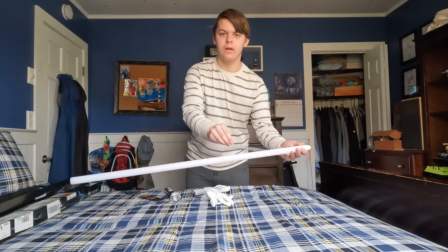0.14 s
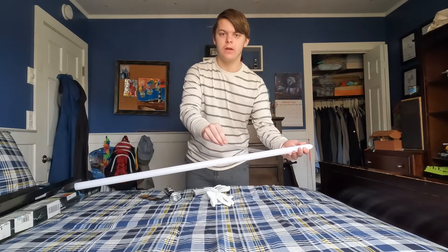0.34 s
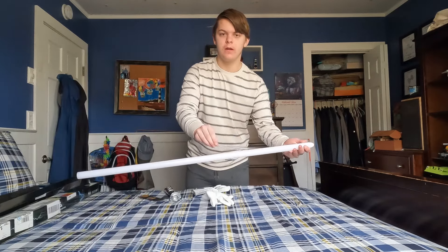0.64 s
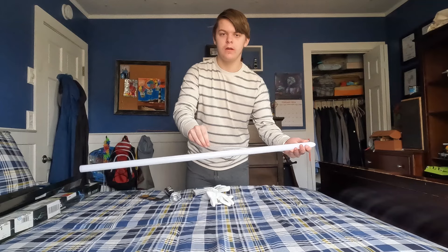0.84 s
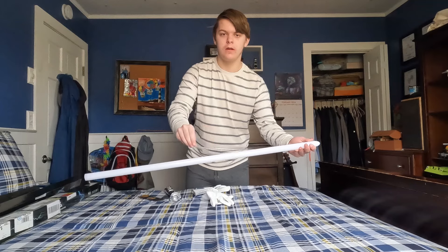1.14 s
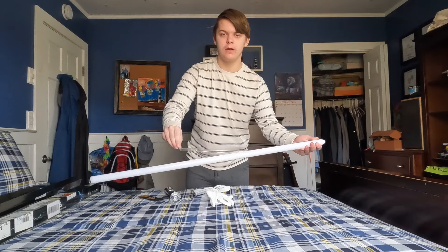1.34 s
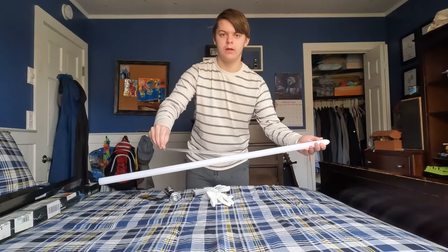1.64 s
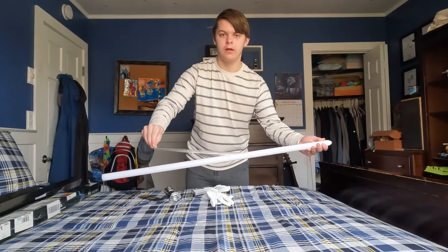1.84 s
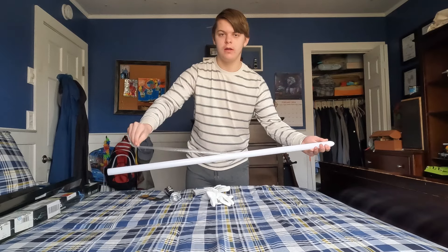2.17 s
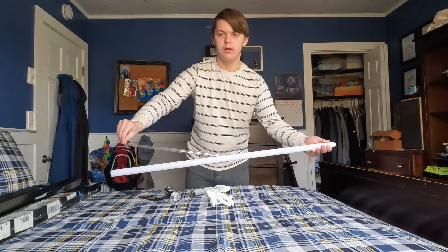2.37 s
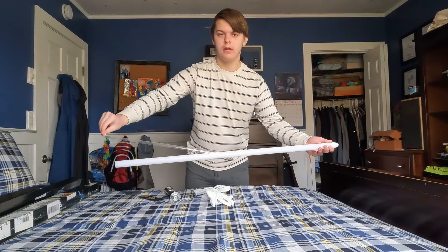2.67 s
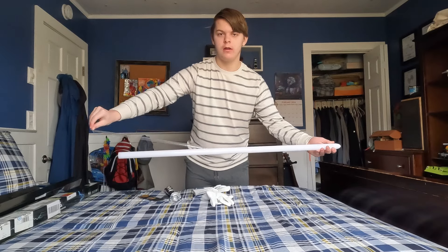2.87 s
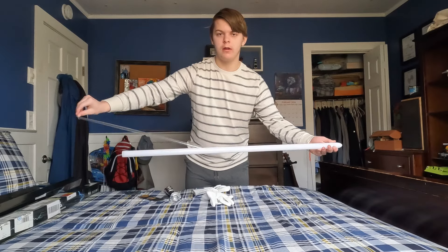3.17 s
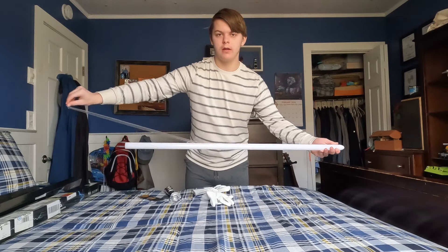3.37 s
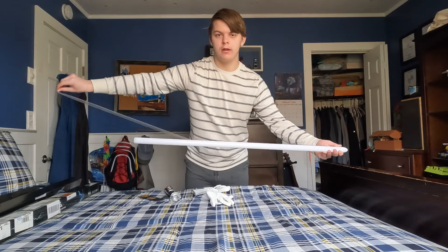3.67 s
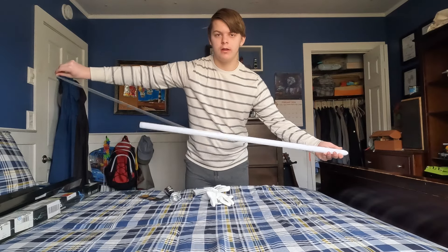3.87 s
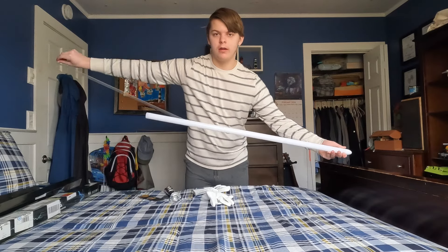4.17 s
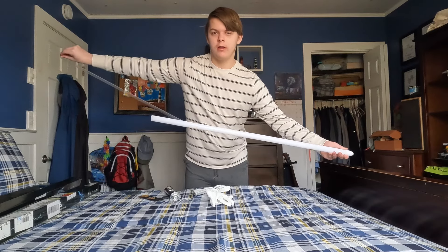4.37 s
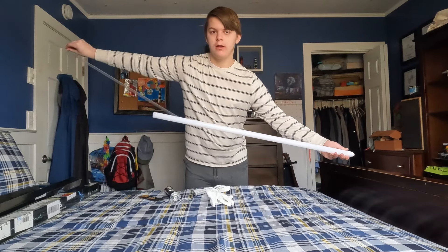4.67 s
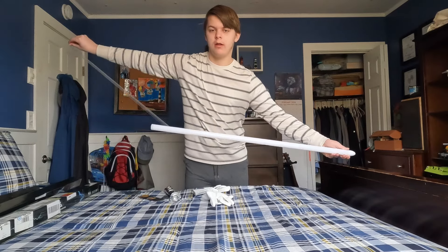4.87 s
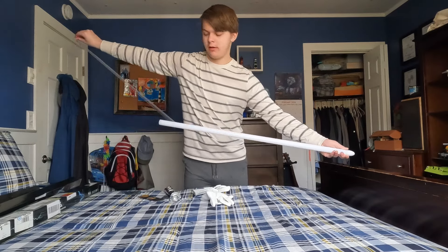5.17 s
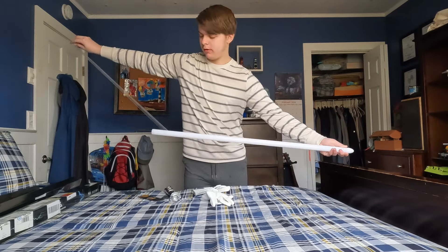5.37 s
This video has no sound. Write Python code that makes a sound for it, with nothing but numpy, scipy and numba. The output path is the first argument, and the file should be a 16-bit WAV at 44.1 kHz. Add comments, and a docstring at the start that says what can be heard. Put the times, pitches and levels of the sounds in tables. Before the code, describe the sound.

Protective film is pulled from a long plastic tube in a small furnished bedroom. A bright, thin hiss of tiny snaps starts at once, dips twice early, then runs fairly smoothly. After three seconds it turns jerky, with sharp cracks clustering near four seconds and a strong rip at about four and a half. It stops around five, leaving a few ticks and faint room tone. Stereo microphone a short distance away, short dense echo.

```python
"""A hissing, crackling peel: protective film is pulled off a long plastic tube in a small bedroom.
The glue lets go in quick, uneven slips, each a shower of tiny snaps that ring the taut film.
Single louder cracks stand out; the freed strip flutters, crumples and thrums, and hand and sleeve brush softly.
Underneath, the moving arm stirs a little air in the quiet of the house.
Every sound is shaped noise or clicks; the film sounds also pass through a short room echo."""
import sys
import numpy as np
from scipy import signal
from scipy.fft import rfft, irfft
from scipy.io import wavfile
from scipy.ndimage import uniform_filter1d
from numba import njit

SR = 44100
rng = np.random.default_rng(int(sys.argv[2]) if len(sys.argv) > 2 else 0)


def to_wav(s):
    """Save 16-bit WAV."""
    ch = np.atleast_2d(s).T  # columns
    pcm = np.round(np.clip(ch, -1, 1) * 32767)  # PCM
    wavfile.write(sys.argv[1], SR, pcm.astype(np.int16))


N = 243255
T = np.arange(N) / SR  # time of each sample, s

# Colour of the long, slack film: (frequency [Hz], spectrum level [dB])
FILM_COLOUR = [(500, -39), (980, -30), (1450, -18), (2200, -16.5), (3400, -8.5), (4400, -3), (5000, 0.5),
               (6600, -4), (7600, -4), (8250, -9.5), (9800, -11.5), (10600, -9), (13600, -16.5),
               (15000, -28.5)]
# Colour of the film while the freed strip is short and taut: (frequency [Hz], spectrum level [dB])
TAUT_FILM_COLOUR = [(500, -47), (950, -47), (1450, -30), (2500, -7), (3300, -25), (4450, 2), (5100, 3),
                    (6600, 6.5), (7700, -11), (8300, -4), (9900, 0), (10650, 6), (12200, 1), (15000, -29)]
# Blend towards the taut colour: (time [s], share [0-1])
TAUT_SHARE = [(0, 0.3), (1.3, 0.37), (3.4, 0.05)]
# Main resonance of the film between tugs: (time [s], frequency [Hz])
RING = [(0, 5600), (.56, 4680), (.92, 7050), (1.08, 4840), (1.22, 7340), (2.3, 6030), (4.6, 6370),
        (5.5, 5940)]
# Treble against the resonance between tugs: (time [s], level [dB])
SHEEN = [(0, -11), (1.06, -8), (1.36, 0.5), (1.8, -12.5), (2.25, -3.5), (2.6, -6.5), (4.45, -6), (5.5, -7)]
PULL_JERK, TUG_JERK = .24, .62  # share of the sound's power that comes in slips
WAVER_DB, WAVER_JERK_DB = .5, .5  # unevenness of the peel, and what full jerking adds
TUG_SAG_HZ, SHEEN_TUG_DB = 630, -1  # a tug lowers the resonance and the treble by this much
BODY_SHORT_DB, BODY_LONG_DB = -16, -7  # mid-range against the resonance, short strip and long
KNOCK_DB = -29  # knock of the tube against the resonance, before the tug's extra body


def peel():
    """Showers of snaps ring the film: an even pull gives a smooth hiss, a jerky one crackles and wavers."""
    gain, tugging, tug_body_db = effort()
    jerk = PULL_JERK + (TUG_JERK - PULL_JERK) * tugging
    slip_power = slips(rate=190, uneven=.3, scatter_db=3.3, fade_s=0.002)
    release = np.sqrt(1 - jerk + jerk * slip_power)
    threads = crackle(rate=13000, scatter_db=2.2)
    waver = undb((WAVER_DB + WAVER_JERK_DB * jerk) * walk(45))
    showers = threads * release * waver

    # the taut colour gives way to the slack one as the freed strip grows long
    taut = np.clip(curves(TAUT_SHARE)[0], 0, 1)
    taut_film = unit(colour(showers, TAUT_FILM_COLOUR))
    slack_film = unit(colour(showers, FILM_COLOUR))
    film = taut * taut_film + (1 - taut) * slack_film

    # the main resonance rises and falls with the tension at the peel line
    ring_hz = curves(RING)[0] - TUG_SAG_HZ * tugging
    film = film + 0.74 * resonance(film, ring_hz, width_hz=3400.0)
    body, ring, sheen = (unit(part) for part in split(film, low_hz=3744, high_hz=8460))

    # a longer strip radiates more of the mid-range
    body_db = np.linspace(BODY_SHORT_DB, BODY_LONG_DB, N) + tug_body_db
    sheen_db = curves(SHEEN)[0] + SHEEN_TUG_DB * tugging
    # hard slips also knock the tube, lower than the film rings
    knock = undb(KNOCK_DB + tug_body_db) * tugging * unit(band(showers, lo_hz=950, hi_hz=1610))
    return gain * (ring + undb(body_db) * body + undb(sheen_db) * sheen + knock)


# Steady pull of the arm, with two early hesitations and a halt: (time [s], peel level [dB])
PULL = [(0, -37), (.38, -41), (.61, -39.5), (.71, -53), (.8, -52.5), (.9, -40), (1.07, -44.5),
        (1.22, -44.5), (1.32, -55), (1.6, -44), (1.9, -41.5), (2.05, -45.5), (2.65, -44.5), (3.1, -47),
        (4.28, -49.5), (4.58, -34), (4.8, -49), (4.98, -48), (5.02, -65.5), (5.5, -105)]
# Sharp tugs, in which the glue lets go in jerks:
# (start time [s], length [s], level [dB], extra mid-range body [dB])
TUGS = [(0, 0.0074, -32.5, -1.5), (0.097, 0.026, -43, -16), (0.46, 0.083, -43, 2), (0.731, 0.013, -50, 12),
        (1.103, 0.067, -48, 2), (2.774, 0.063, -41, -3), (2.879, 0.03, -39, -1.5),
        (3.345, 0.065, -39.5, -4), (3.446, 0.014, -35, -4), (3.521, 0.03, -38, 1.5), (3.814, 0.039, -42, 1),
        (3.868, 0.042, -39, 3.5), (3.936, 0.044, -31, -0.5), (3.996, 0.044, -32, -1),
        (4.108, 0.023, -41, 2), (4.216, 0.012, -38, -1), (4.306, 0.072, -44.5, -1), (4.55, 0.047, -41, -27),
        (4.821, 0.027, -42, 9), (4.912, 0.031, -42.5, 4), (5.094, 0.013, -66.5, -11),
        (5.194, 0.013, -66.5, -12.5), (5.352, .03, -51.5, -5.5), (5.379, 0.0093, -48, 7),
        (5.51, .03, -40.5, -3)]
TUG_ATTACK_S, TUG_RELEASE_S = .005, .017


def effort():
    """Peel gain, the tugs' share of its power and their extra body; a tug rises, holds and dies away."""
    tugs = body = 0
    for s, length, db, body_db in TUGS:
        attack = (1 + np.tanh((T - s) / (2 * TUG_ATTACK_S))) / 2
        release = np.exp(-np.maximum(T - s - length, 0) / TUG_RELEASE_S)
        tug = (undb(db) * attack * release) ** 2
        tugs = tugs + tug
        body = body + body_db * tug
    power = undb(curves(PULL)[0]) ** 2 + tugs
    return np.sqrt(power), tugs / power, body / power


def slips(rate, uneven, scatter_db, fade_s, count=3000):
    """Power of the stick-slip: each slip starts at once and dies within milliseconds."""
    chance = rng.standard_normal((count, 2))
    gaps = np.exp(uneven * chance[:, 0])  # uneven waits, in units of the mean pace
    at = (np.cumsum(gaps) * SR / rate).astype(int)
    inside = at < N
    strength = undb(scatter_db * np.clip(chance[inside, 1], -2, 2)) ** 2
    kicks = np.bincount(at[inside], strength, N)
    power = signal.lfilter([1], [1, -np.exp(-2 / (fade_s * SR))], kicks)
    return power / power.mean()


def crackle(rate, scatter_db):
    """Tiny random snaps, of either sign and unequal size, scaled to rms 1."""
    happens = rng.random(N) < rate / SR
    sign = rng.choice([-1, 1], N)
    size = undb(scatter_db * np.clip(rng.standard_normal(N), -2, 2))
    return unit(happens * sign * size)


@njit
def resonance(x, hz, width_hz):
    """State-variable band-pass whose centre may move; gain 1 at the centre."""
    y, b, l = np.empty(len(x)), 0., 0.  # output, band-pass state, low-pass state
    for i in range(len(x)):
        g, k = np.tan(np.pi * hz[i] / SR), width_hz / hz[i]
        v = (b + g * (x[i] - l)) / (1 + g * (g + k))
        b, l, y[i] = 2 * v - b, l + 2 * g * v, k * v
    return y


# Single loud snaps of the glue: (time [s], level before the shared gain and film colour [dB])
SNAPS = [(0.1334, -24), (0.3346, -27), (1.2384, -29), (2.8414, -26), (2.9108, -25), (3.3633, -27),
         (3.3874, -26), (3.4604, -20), (3.4654, -22), (3.5304, -23), (3.8684, -23), (3.8984, -23),
         (3.9524, -18), (3.9674, -18), (4.3141, -28), (4.5635, -21), (4.8359, -24), (4.8514, -25),
         (4.9217, -26), (5.1023, -52), (5.1627, -56), (5.2066, -50), (5.3892, -32), (5.3924, -31)]
SNAP_GAIN_DB, SNAP_SPRAY, SNAP_FADE_S = 16, .3, .001  # shared gain, spray against the crack, spray decay


def snaps(size=400):
    """A larger patch of glue gives way: one crack and a short spray after it."""
    out = np.zeros(N + size)
    for (s, db), spray in zip(SNAPS, rng.standard_normal((len(SNAPS), size))):
        burst = SNAP_SPRAY * spray * np.exp(-T[:size] / SNAP_FADE_S)
        burst[0] = 1  # the crack itself
        at = int(s * SR)
        out[at:at + size] += undb(db + SNAP_GAIN_DB) * burst / np.linalg.norm(burst)
    return colour(out[:N], FILM_COLOUR)


# Colours of flutter and crumpling: (frequency [Hz], relative level [dB])
FLUTTER_COLOUR = [(70, -47), (130, -11), (190, -3.5), (260, -0.5), (350, -4.5), (450, -14.5), (800, -37)]
CRUMPLE_COLOUR = [(250, -7), (420, -2.5), (640, -2.5), (900, -16), (1500, -17.5)]
# Steady flutter of the loose strip, around which it wavers: (time [s], level [dB])
FLUTTERING = [(0, -70.5), (1.05, -79), (1.5, -69), (2.5, -65), (3.5, -59.5), (4.1, -64), (4.6, -69),
              (5.2, -94)]
# Larger flaps of the strip: (middle time [s], length [s], level [dB], crumpling against the flap [dB])
FLAPS = [(.3, 1, -71, -1), (1.268, 0.13, -69, 8.5), (1.387, 0.14, -60, -16), (1.627, 0.089, -58, -22),
         (1.983, 0.27, -60.5, -6), (2.788, 0.22, -61, 2), (3.107, 0.61, -60.5, -26),
         (3.727, 0.16, -57.5, -3.5), (3.888, 0.055, -60, 6), (4.178, .08, -60.5, 4.5),
         (4.311, 0.21, -55.5, -1), (4.865, 0.33, -52.5, -2), (5.381, 0.066, -59, 0)]
FLUTTER_CRUMPLE_DB = -3.5  # crumpling against the steady flutter


def strip():
    """The freed film flaps with a soft low flutter and crumples a little higher."""
    steady = undb(curves(FLUTTERING)[0] + walk(16))
    flaps = swells((s, length, db) for s, length, db, _ in FLAPS)
    creases = swells((s, length, db + crumple_db) for s, length, db, crumple_db in FLAPS)
    flutter = unit(colour(rng.standard_normal(N), FLUTTER_COLOUR))
    crumple = unit(colour(crackle(rate=700, scatter_db=0.5), CRUMPLE_COLOUR))
    flutter_gain = np.hypot(steady, flaps)
    crumple_gain = np.hypot(undb(FLUTTER_CRUMPLE_DB) * steady, creases)
    return flutter_gain * flutter + crumple_gain * crumple


# Thrum of the stretched strip: (time [s], pitch of the lowest mode [Hz], its level [dB])
THRUM = [(.9, 175, -85), (1.15, 175, -67), (1.5, 240, -72), (1.63, 235, -64), (2.05, 250, -55.5),
         (2.3, 195, -61.5), (2.6, 177, -58), (3.1, 164, -63), (3.85, 160, -60.5), (4.02, 175, -73.5),
         (4.25, 195, -59), (4.55, 190, -86)]
SECOND_MODE_RATIO, SECOND_MODE_DB = 1.9, -15.5  # pitch and level against the lowest mode


def thrum(width_hz):
    """The stretched strip is shaken at random and answers in its two lowest modes."""
    hz, level_db = curves(THRUM)
    phase = 2 * np.pi * np.cumsum(hz) / SR

    def mode(ratio):
        """A tone whose strength and phase wander at random."""
        wander = walk(width_hz) + 1j * walk(width_hz)
        return np.real(wander * np.exp(1j * ratio * phase))

    return undb(level_db) * (mode(1) + undb(SECOND_MODE_DB) * mode(SECOND_MODE_RATIO))


# Soft brushes of hand and sleeve:
# (middle time [s], length [s], low edge [Hz], high edge [Hz], level [dB])
BRUSHES = [(0.206, 0.63, 49.7, 139, -69), (.9, 0.97, 59, 140, -71), (1.907, 0.71, 62, 124, -60),
           (5.315, 0.078, 453, 1840, -69.5)]


def brushes():
    """Dull swells of band-passed noise: rubbing as the grip and the arm shift."""
    out = 0
    for s, length, lo_hz, hi_hz, db in BRUSHES:
        rub = unit(band(rng.standard_normal(N), lo_hz, hi_hz))
        out = out + undb(db) * swell(s, length) * rub
    return out


def travelling(x, count):
    """The peel line moves along the tube, so each stretch of the way has its own echo pattern."""
    way = np.linspace(0, count - 1, N)
    out = 0
    for k in range(count):
        # neighbouring stretches blend smoothly
        share = np.cos(np.pi / 2 * np.clip(2 * abs(way - k) - .5, 0, 1)) ** 1.4
        out = out + bedroom(x * share, wet_db=1.5, build_s=0.00047)
    return out


# Likeness of the echo at the two microphones: (frequency [Hz], likeness, held within -1..1)
LIKENESS = [(100, 1.1), (500, 0.85), (1050, -0.77), (2150, 0.76), (3100, -0.64), (4400, 0.77), (6200, 0.49),
            (8300, 0.13), (9400, 0.35), (10500, 0.5), (11600, -0.16), (14000, -1)]
# Stereo balance: (frequency [Hz], left minus right [dB])
BALANCE = [(100, -3.5), (700, 1.6), (1300, -5.5), (1900, 1), (2800, 4), (3400, -2), (4300, 1), (5300, 2),
           (5900, -1), (6700, 3.5), (8000, 2.5), (10300, 2.5), (11400, 5.5), (15000, 6.5)]
ROOM_T60_S = 0.23  # time for the echo to fall by 60 dB


def bedroom(x, wet_db, build_s, size=16384):
    """Direct sound plus a short dense echo, whose likeness at the two microphones changes with pitch."""
    t = T[:size]
    decay = undb(-60 * t / ROOM_T60_S) * (1 - np.exp(-t / build_s))
    tails = rng.standard_normal((2, size)) * decay
    mid, side = rfft(tails / np.linalg.norm(tails, axis=1)[:, None])
    alike = np.clip(over_bins(LIKENESS, size), -1, 1)
    mid = mid * np.sqrt((1 + alike) / 2)
    side = side * np.sqrt((1 - alike) / 2)
    wet = undb(wet_db)
    ports = (1 + wet * np.array([mid + side, mid - side])) / np.hypot(1, wet)
    ports = ports * undb(np.outer([1, -1], over_bins(BALANCE, size)) / 2)
    lead = 256  # samples of room for the part of the response that comes before time zero
    response = np.roll(irfft(ports), lead, axis=1)
    return signal.fftconvolve(x[None], response, axes=1)[:, lead:lead + N]


# Colour of the stirred air: (frequency [Hz], relative level [dB])
DRAUGHT_COLOUR = [(12, 12.5), (24, 15.5), (45, 4), (90, -34), (200, -54)]
# Stirred air of the sweeping arm: (middle time [s], length [s], level [dB])
GUSTS = [(2.88, 0.25, -48), (3.13, 0.4, -59), (3.79, 0.38, -59), (4.75, 0.44, -58.5), (5.3, 0.96, -60.5)]
STILL_AIR_DB = -71.5


def stirred_air():
    """Very low noise that swells as the sweeping arm moves the air."""
    gain = np.hypot(undb(STILL_AIR_DB), swells(GUSTS))
    return background(DRAUGHT_COLOUR, side_db=-31) * gain


# Colour of the quiet house: (frequency [Hz], relative level [dB])
QUIET_COLOUR = [(20, -15), (60, -8), (90, -12), (170, -1), (240, -8), (500, -16.5), (1000, -29),
                (3000, -33.5), (8000, -43), (15000, -46)]


def quiet_house():
    """Faint steady noise, mostly low."""
    return undb(-69) * background(QUIET_COLOUR, side_db=-3.5)


def background(points, side_db):
    """Steady noise of one colour; a shared part plus an opposed part that sets the width."""
    mid, side = (unit(colour(rng.standard_normal(N), points)) for _ in range(2))
    return mid + undb(side_db) * np.outer([1, -1], side)


def undb(db):
    """Decibels to amplitude."""
    return 10 ** (np.asarray(db) / 20)


def unit(x):
    """Scale to rms 1."""
    return x / np.sqrt(np.mean(x ** 2))


def curves(table):
    """The columns of a time table, one value a sample."""
    s, *columns = np.transpose(table)
    return [np.interp(T, s, c) for c in columns]


def over_bins(points, size):
    """A (frequency [Hz], value) table read at the bins of a transform, on a log frequency scale."""
    hz, value = np.transpose(points)
    bins_hz = np.arange(size // 2 + 1) * SR / size
    return np.interp(np.log(bins_hz + 1), np.log(hz), value)


def colour(x, points, size=4096):
    """Causal minimum-phase filter with the given spectrum, so that clicks keep their sharp front."""
    cepstrum = irfft(np.log(undb(over_bins(points, size))))
    # fold the cepstrum onto positive time
    cepstrum[1:size // 2] *= 2
    cepstrum[size // 2 + 1:] = 0
    return signal.fftconvolve(x, irfft(np.exp(rfft(cepstrum))))[:N]


def band(x, lo_hz, hi_hz):
    """Causal band-pass."""
    edges = [lo_hz, min(hi_hz, SR / 2 - 1)]
    return signal.sosfilt(signal.butter(3, edges, "band", fs=SR, output="sos"), x)


def split(x, low_hz, high_hz):
    """Bass, middle and treble parts that add up to the whole."""
    low, below = (signal.sosfiltfilt(signal.butter(4, hz, fs=SR, output="sos"), x)
                  for hz in (low_hz, high_hz))
    return low, below - low, x - below


def walk(rate):
    """Smooth random wander of rms 1, with a new target rate times a second."""
    k = int(SR / rate)
    steps = np.repeat(rng.standard_normal(N // k + 1), k)
    return unit(uniform_filter1d(steps, k)[:N])


def swell(s, length):
    """A smooth rise and fall around the time s."""
    return np.cos(np.pi * np.clip((T - s) / length, -.5, .5))


def swells(table):
    """Joint gain of swells given as (middle time [s], length [s], level [dB])."""
    return sum(undb(db) * swell(s, length) for s, length, db in table)


def scene():
    """Film and strip in the room, over stirred air and the quiet of the house."""
    film = peel() + snaps() + strip() + thrum(width_hz=34) + brushes()
    return travelling(film, count=9) + stirred_air() + quiet_house()


TOP_HZ = 15700


def record(dry):
    """A steep low-pass cuts the top."""
    return signal.sosfilt(signal.ellip(10, .2, 70, TOP_HZ, fs=SR, output="sos"), dry)


dry = scene()
out = record(dry)
to_wav(out)
```